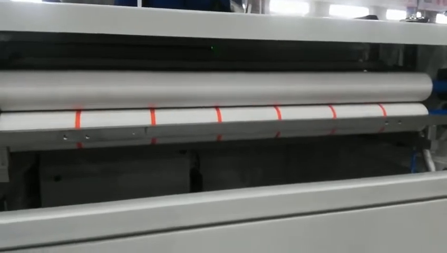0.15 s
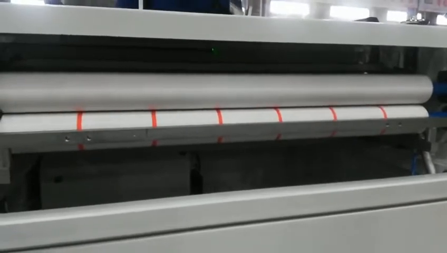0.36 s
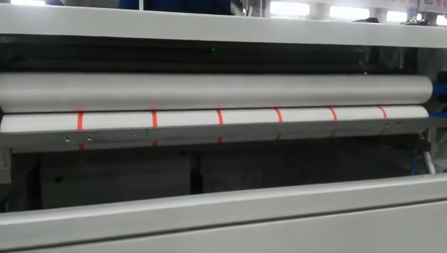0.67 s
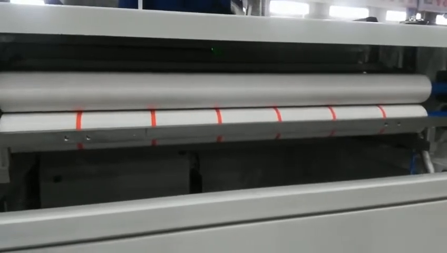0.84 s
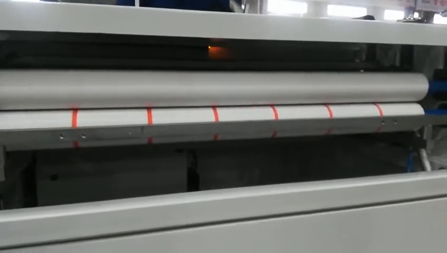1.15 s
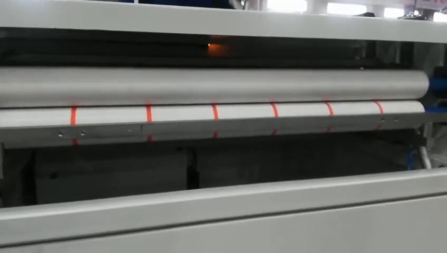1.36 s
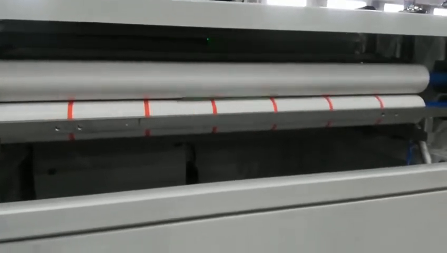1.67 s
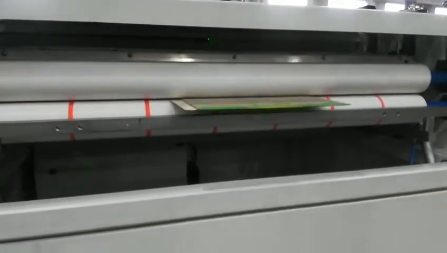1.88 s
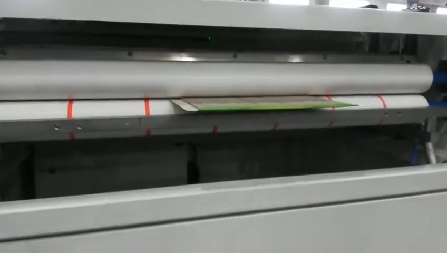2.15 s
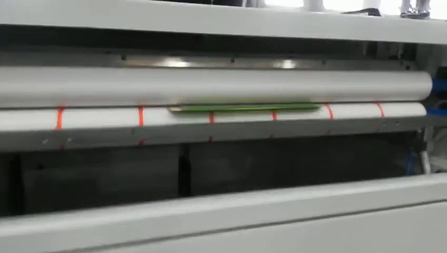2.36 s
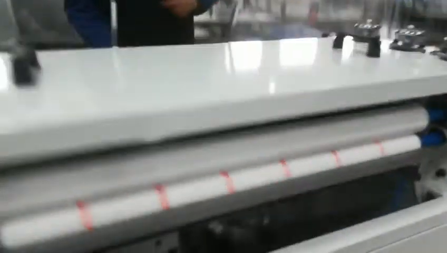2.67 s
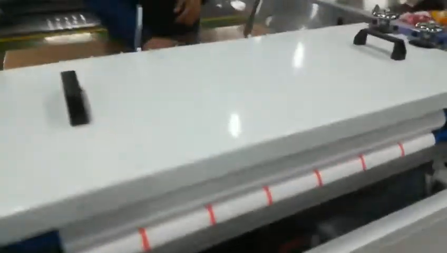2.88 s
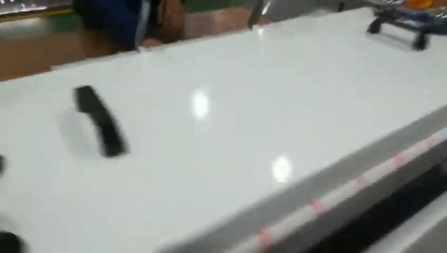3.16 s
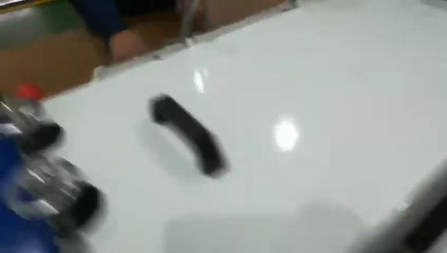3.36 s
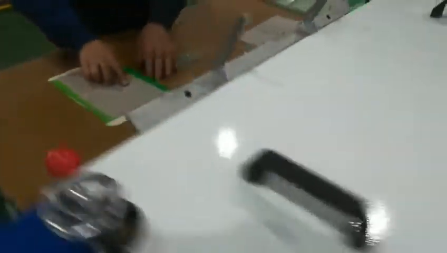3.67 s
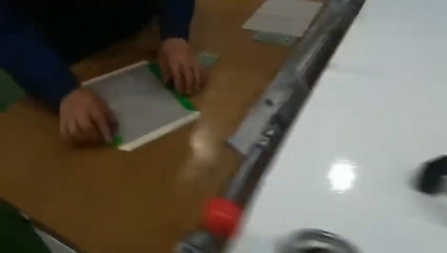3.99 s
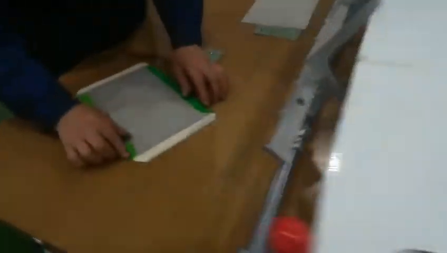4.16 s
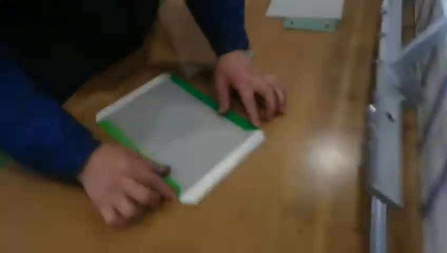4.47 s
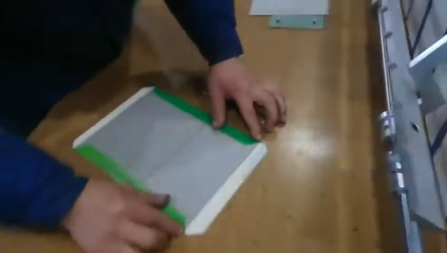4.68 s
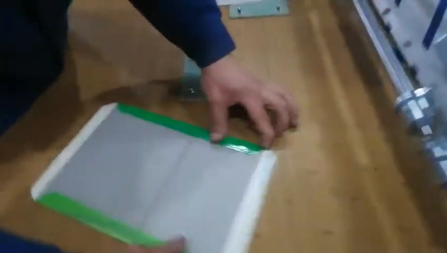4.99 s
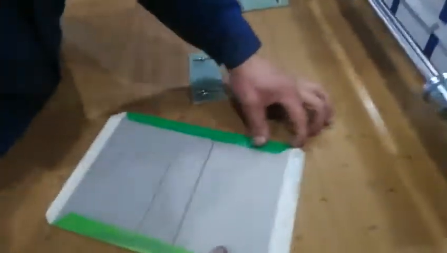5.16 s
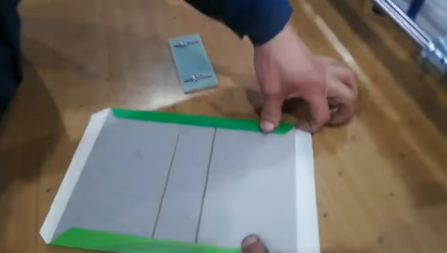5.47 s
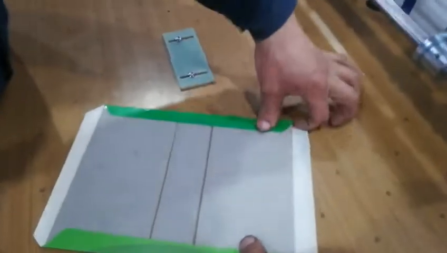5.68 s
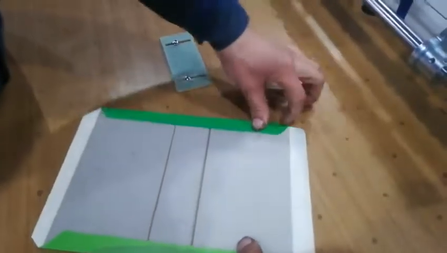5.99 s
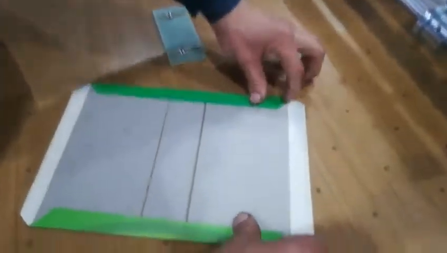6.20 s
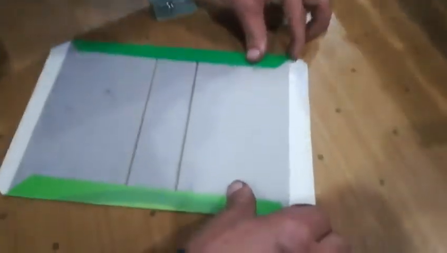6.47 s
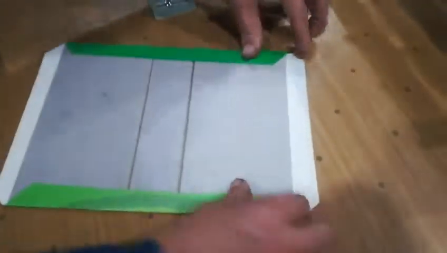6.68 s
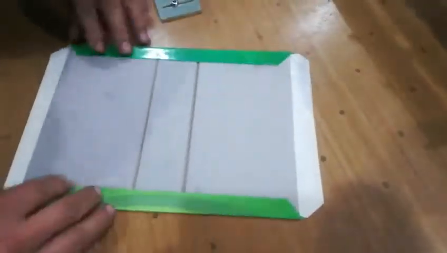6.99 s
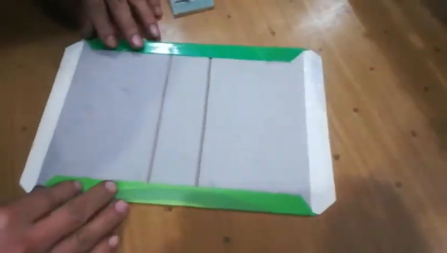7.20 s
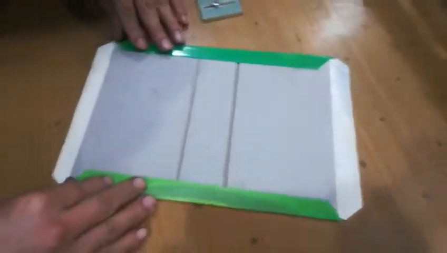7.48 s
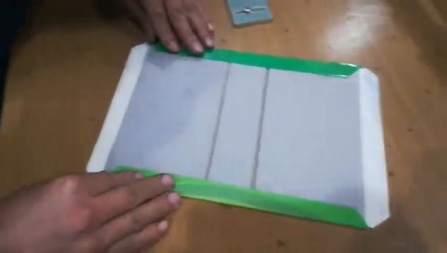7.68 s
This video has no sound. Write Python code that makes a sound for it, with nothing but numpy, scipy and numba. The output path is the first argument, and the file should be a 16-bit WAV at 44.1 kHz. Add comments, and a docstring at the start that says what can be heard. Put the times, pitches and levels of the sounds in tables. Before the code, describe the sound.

Over a motor drone, guides rattle and metal slams and scrapes repeatedly for about two seconds, followed by a swelling, lingering pneumatic hiss.

```python
"""In a factory hall, a hand-held phone hears a book-cover machine pull a board through its rollers.
Motors and a blower hum throughout: shaped noise, a noisy low resonance and thin wavering whines.
Rollers rumble, guides rattle and the board rubs: shaped noise and tiny random contacts under envelopes.
Steel folding bars clash and chatter through panel, cavity and hall echoes; then air hisses and whistles.
The phone's two ports colour the sound, and its gain control ducks everything under the loudest blows."""
import sys
import numpy as np
from scipy import signal
from scipy.fft import rfft, irfft, next_fast_len
from scipy.io import wavfile
from numba import njit

SR = 44100
rng = np.random.default_rng(int(sys.argv[2]) if len(sys.argv) > 2 else 0)


def generate_wav(sig):
    """Save sig (samples, or channels by samples) to the path in sys.argv[1] as 16-bit PCM at SR."""
    pcm = np.round(np.clip(np.atleast_2d(sig).T, -1, 1) * 32767).astype(np.int16)
    wavfile.write(sys.argv[1], SR, pcm)


N = 345744
T = np.arange(N) / SR  # time in seconds

# Source levels are those ahead of the phone's port colour and gain control.
# Idling machinery: start_s, drone_db, hum_db
IDLE_LEVELS = [(.3, -42.5, -52), (3.4, -39.5, -49.5), (4.3, -43, -50.5), (4.65, -41, -46.5),
               (6.5, -39.5, -45.5), (7.8, -41.5, -47)]
# Whines of motors and blower: pitch_hz, level_db
WHINES = [(712, -63), (1744, -61), (2509, -65), (4425, -68), (10497, -80)]
# Spectrum of the motor drone: frequency_hz, relative_db
DRONE_SPECTRUM = [(22, -38), (43, -10), (75, -8.5), (102, -5), (150, -5), (210, -3.5), (355, -10.5),
                  (600, -20), (780, -59), (1320, -120)]
# Spectrum of the blower's rush: frequency_hz, relative_db
BLOWER_SPECTRUM = [(290, -27), (500, -3), (537, -6.5), (706, 1.5), (769, 0), (927, -4), (1650, -6),
                   (2450, -2.5), (3100, -7), (3730, -7.5), (4310, -3.5), (6600, -10.5), (7600, -18),
                   (10700, -26.5), (15500, -64)]
# Spectrum of the escaping air: frequency_hz, relative_db
JET_SPECTRUM = [(880, -47), (1600, -15), (2600, -7), (3900, -3), (4300, 1.5), (5000, 2), (6800, -2.5),
                (7200, -9.5), (9230, -15), (15500, -47)]
# Squeaks of the slides and whistles of the valve: start_s, end_s, pitch_hz, level_db, waver_hz
SQUEALS = [(1.28, 1.325, 1240, -32, 110), (2.405, 2.455, 1250, -36, 130), (2.64, 2.668, 4380, -19, 160),
           (2.93, 3.165, 2380, -35.5, 140), (3.68, 3.81, 5739, -44, 22), (3.775, 3.89, 5115, -37.5, 30),
           (3.83, 4.16, 5108, -37, 30), (4.26, 4.5, 4450, -38, 130), (4.66, 5.25, 4430, -42, 130)]
# Dull knocks of the carriage: start_s, pitch_hz, level_db
KNOCKS = [(.765, 296, -28), (1.075, 160.6, -20), (1.846, 61.4, -30), (2.01, 78, -33), (2.118, 188, -25),
          (2.648, 71.4, -32), (2.96, 486, -29.5)]
# Jolts of the carriage as it starts, turns and stops: start_s, length_s, level_db
JOLTS = [(0.558, 0.39, -42.5), (1.597, 0.036, -25.5), (2.86, 0.1, -31.5)]
# Spectrum of the shaken cabinet: frequency_hz, relative_db
CABINET_SPECTRUM = [(260, -2.5), (340, -5), (500, 0.5), (720, 5), (900, -1.5), (1200, -11)]
# Pushes of the feed: start_s, end_s, start_pitch_hz, end_pitch_hz, level_db
SWISHES = [(.56, .98, 740, 1050, -43.5), (1.17, 1.31, 1005, 1300, -39.5), (1.5, 1.57, 1184, 1500, -35),
           (2.02, 2.12, 862, 1150, -41), (2.33, 2.45, 1154, 1400, -37)]
# Runs of the rollers: start_s, end_s, rumble_db
ROLLER_RUNS = [(0.74, 0.804, -29.5), (0.916, 1.254, -33.5), (1.425, 1.86, -39.5), (2.047, 2.135, -39.5)]
# Spectrum of the roller rumble: frequency_hz, relative_db
ROLLER_SPECTRUM = [(30, -16.5), (129, -7), (156, 2.5), (195, -17), (309, 1.5), (355, -11), (500, -11),
                   (650, -16), (1100, -120)]
# Spectrum of the rubbing board: frequency_hz, relative_db
BOARD_SPECTRUM = [(400, -6), (560, -4), (780, -1), (930, -2), (1230, -1.5), (1500, -3), (1900, 0),
                  (2300, -7)]
# Spectrum of the scraping slides, also used for the guides' taps: frequency_hz, relative_db
SLIDE_SPECTRUM = [(1060, -9.5), (1500, -11), (1900, -16), (2400, -6), (3300, -7), (4800, -3.5),
                  (6400, -5.5), (7440, -19.5), (9050, -25.5), (15000, -88)]
# Rattles of the guides as the board is drawn in: start_s, level_db, length_s
RATTLES = [(0.563, -32.5, .008), (0.738, -22.5, 0.009), (0.751, -20, .02), (.814, -27, 0.01),
           (0.887, -29.5, 0.058), (.944, -22.5, 0.032), (1.01, -28, .008), (1.06, -28.5, 0.014),
           (1.104, -37, .015), (1.172, -23, 0.017), (1.22, -25.5, .008), (1.259, -25.5, .012)]
# Ringing of the guides: pitch_hz, relative_db
GUIDE_MODES = [(800, 0), (1150, -2), (1850, -2), (2110, 0), (2320, 1), (4380, 0), (4700, 0), (5250, -1)]
# Ringing of the end stop: pitch_hz, relative_db, t60_s
END_STOP_MODES = [(770, -6, .08), (2420, -5, .13), (4790, 0, .09)]
# Blows of the folding bars: start_s, relative_db, low_body_db, treble_edge_db, chatter_s
BLOWS = [(1.292, -13, -5, 0.5, 0.0052), (1.317, -9.5, -10, -1, 0.0053), (1.339, -14, 5.5, 7, 0.01),
         (1.469, -15, -3, 8.5, 0.012), (1.571, -7, 2.5, 9.5, 0.055), (1.683, -17.5, 6.5, 5, 0.037),
         (1.737, -15.5, -1, 3.5, 0.033), (1.84, -25.5, 6, -1, .02), (1.89, -21, -19, -5.5, 0.01),
         (1.937, -33, -14, 0, 0.012), (2.144, -24.5, -2, 1, 0.015), (2.189, -11, 3, 7, 0.04),
         (2.286, -18, 6.5, 3, .014), (2.448, -17, 7, 5, 0.018), (2.4824, -1.5, -1.5, 7.5, 0.015),
         (2.55, -12, 1, 5, 0.012), (2.6, -17, -5, 4, 0.011), (2.646, -20, 10.5, 7, 0.0098),
         (2.849, -25, -3, -10, .006), (2.865, -10, 5, 2, 0.041), (2.96, -17.5, 6, 0.5, 0.033),
         (3.046, -24.5, -2, -7, 0.014)]
# Spectrum of the struck steel: frequency_hz, relative_db
STEEL_SPECTRUM = [(240, -29.5), (400, -22.5), (520, -24.5), (720, -14), (971, -15.5), (1150, -13),
                  (1600, -14), (1900, -9), (2510, -3), (3400, -6.5), (5000, 3), (6400, -0.5), (9060, -14.5),
                  (15500, -47)]
# Ringing of the steel frame: pitch_hz, relative_db, t60_s
FRAME_MODES = [(710, -8, .45), (1040, -6, .3), (2140, -8, .25), (2600, -6, .35), (4331, -9, .25),
               (4885, -11, .25), (5207, -10, .25), (6254, -9, .25), (8924, -2, .25)]
# Where the bars lie as the phone turns: time_s, left_minus_right_db
BEARING = [(1.5, 0.5), (2.5, 1.5), (3.05, 3.5)]
# How unlike the two ports hear the hall: frequency_hz, side_minus_mid_db
HALL_WIDTH = [(60, -37), (180, -15.5), (300, -10.5), (450, 2), (650, 6), (1000, 0.5)]
# How differently the two microphone ports colour the sound: frequency_hz, left_minus_right_db
PORT_COLOUR = [(500, 0), (750, 1), (1100, 1.5), (1600, 2), (2450, 7), (3300, -.5), (4300, -1.5), (5300, -7),
               (6100, -1), (6900, 3), (8200, 4), (10500, 8), (13000, 2)]

# cabinet resonance in which the motors hum, and the blower
HUM_HZ, HUM_WIDTH_HZ, BLOWER_DB = 199.8, 50, -41
# air valve: a slight leak, then open and shut; the top hiss builds sooner than the full rush
LEAK_S, OPEN_S, SHUT_S = 3.19, 3.78, 4.95
RUSH_DB, RUSH_RISE_S, RUSH_T60_S = -31, 0.5, 2.08
TOP_HISS_DB, TOP_RISE_S, TOP_T60_S = -41.5, 0.23, 1.34
LEAK_DB, LEAK_TOP_DB = -43, -56.5
AIR_PAN_DB = 1.8  # left minus right level of the air
SPENT_AIR_DB, SPENT_AIR_T60_S = -35.5, 1.35  # the previous release, still dying away at the start
JOLT_RISE_S, JOLT_T60_S = 0.0025, 0.97
SWISH_WIDTH_HZ, SWISH_RISE_S, SWISH_T60_S = 450, 0.012, 0.12
SPIN_UP_S, SPIN_DOWN_T60_S = 0.046, 1
# feed stroke: the slides start, the board is gripped, and both come to rest together
STROKE_START_S, GRIP_S, STROKE_END_S = 0.566, 0.74, 3.0
STROKE_ATTACK_S, STROKE_T60_S = 0.033, 0.37
GLIDE_DB, SLIP_DB, RUB_DB = -38.5, -46.5, -42  # slides running freely, board sliding in, board gripped
DRAG_DB = -4.5  # added rub while the rollers run, relative to their rumble
# grating after a blow: level at a 0 dB blow, growth in dB per dB of blow, rise, decay
GRATE_DB, GRATE_PER_DB, GRATE_RISE_S, GRATE_T60_S = -11, 0.7, 0.069, 0.38
FULL_CHATTER_S = 0.0089  # chatter length that leaves the grating unscaled; longer grates louder
RUN_UP_DB, RUN_UP_S = -22, 0.063  # scrape swelling around a blow: relative to it, time constant
RATTLE_RISE_S, RATTLE_T60_S = 0.00091, 0.1
BUZZ_DB = -12  # buzz of the guides, relative to the roller rumble
END_STOP_S, END_STOP_DB = 2.8645, -15.5
BLOW_RISE_S = 0.0022
TOP_HZ = 15650  # the phone's treble cut-off


def undb(db):
    """Decibels to amplitude."""
    return 10 ** (np.asarray(db) / 20)


def unit(x):
    """Scale to an RMS of one."""
    return x / np.sqrt(np.mean(x ** 2) + 1e-18)


def on_log(points, hz):
    """Read a spectrum at the given frequencies, along a logarithmic axis."""
    f, db = np.transpose(points)
    return np.interp(np.log(hz + 1), np.log(f), db)


def colour(x, points):
    """Causal minimum-phase filter with the given spectrum, falling steeply beyond its ends."""
    size = 4096
    hz = np.fft.rfftfreq(size, 1 / SR) + 1
    octaves_beyond = np.abs(np.log2(hz / np.clip(hz, points[0][0], points[-1][0])))
    level_db = on_log(points, hz) - np.minimum(40 * octaves_beyond, 70)
    # folding the cepstrum forward in time makes the filter causal
    cepstrum = irfft(np.log(undb(level_db)))
    cepstrum[1:size // 2] *= 2
    cepstrum[size // 2 + 1:] = 0
    response = irfft(np.exp(rfft(cepstrum)))
    return signal.oaconvolve(x, response[None], axes=1)[:, :x.shape[1]]


def diffuse(size):
    """Noise from all sides at two ports: alike in the bass, nearly unrelated in the treble."""
    fast = next_fast_len(size, True)
    mid, side = rfft(rng.standard_normal((2, fast)))
    width = undb(on_log(HALL_WIDTH, np.fft.rfftfreq(fast, 1 / SR)))
    mid = mid / np.hypot(1, width)
    side = side * width / np.hypot(1, width)
    return unit(irfft(np.array([mid + side, mid - side]), fast)[:, :size])


def walk(rate):
    """Smooth random wandering through `rate` knots per second, with a spread near 1."""
    knots = rng.standard_normal(SR // 4)
    return np.interp(T * rate, np.arange(len(knots)), knots)


def fade(t, t60):
    """Exponential decay by 60 dB in t60 seconds."""
    return np.exp(-np.log(1000) * t / t60)


def held(start, end, attack_s, t60):
    """Envelope that rises from start, holds until end, then dies away."""
    return np.clip((T - start) / attack_s, 0, 1) * fade(np.maximum(T - end, 0), t60)


def band(hz, width_hz):
    """A noisy resonance whose centre may move."""
    angle = 2 * np.pi * np.cumsum(hz * np.ones(N)) / SR
    return unit(walk(width_hz) * np.cos(angle) + walk(width_hz) * np.sin(angle))


def contacts(rate, spread_db):
    """Tiny random contacts of very unequal strength, `rate` per second on average."""
    hits = rng.random(N) < rate / SR
    strength = rng.standard_normal(N) * undb(spread_db * rng.standard_normal(N))
    return unit(hits * strength)


def panel(push, panel_t60=0.016, count=3):
    """Contacts land on several places of a sheet-steel panel; each rattles briefly in its own way."""
    size = 2048
    place, out = rng.integers(count, size=len(push)), 0
    for k in range(count):
        response = unit(diffuse(size) * fade(T[:size], panel_t60)) / np.sqrt(size)
        out = out + signal.oaconvolve((push * (place == k))[None], response, axes=1)[:, :len(push)]
    return out


def cavity(x, cavity_db=-4):
    """Dense echoes inside the machine, drawn afresh for every source."""
    size, cavity_t60 = SR // 3, 0.32
    tail = undb(cavity_db) * unit(diffuse(size) * fade(T[:size], cavity_t60)) / np.sqrt(size)
    return x + signal.fftconvolve(x, tail, axes=1)[:, :x.shape[1]]


def housing(x, hall_db=-17):
    """The sound rings the steel frame's modes and dies away in the hall."""
    t = T[:SR]
    hall_t60, ring_db = 0.9, -20
    hz, db, t60 = np.transpose(FRAME_MODES)[:, :, None]
    phase = rng.random((2, len(FRAME_MODES), 1))
    modes = undb(db) * fade(t, t60) * np.sin(2 * np.pi * (hz * t + phase))
    hall = undb(hall_db) * unit(diffuse(SR) * fade(t, hall_t60))
    tail = hall + undb(ring_db) * unit(modes.sum(axis=1))
    return x + signal.oaconvolve(x, tail / np.sqrt(SR), axes=1)[:, :N]


def idling(flicker_db=1.0):
    """Motors drone, hum and throb in the cabinet; a blower rushes under thin wavering whines."""
    times, *levels = np.transpose(IDLE_LEVELS)
    drone, hum = (undb(np.interp(T, times, db)) for db in levels)
    out = drone * undb(0.8 * walk(30)) * unit(colour(diffuse(N), DRONE_SPECTRUM))
    out += hum * band(HUM_HZ, HUM_WIDTH_HZ)
    out += undb(BLOWER_DB) * undb(flicker_db * walk(15)) * unit(colour(diffuse(N), BLOWER_SPECTRUM))
    for hz, db in WHINES:
        # a random phase at each port; pitch and level both waver
        turns = np.cumsum(hz + 18 * walk(90)) / SR + rng.random((2, 1)) / 2
        out += undb(db + 2.5 * walk(5)) * np.sqrt(2) * np.sin(2 * np.pi * turns)
    return out


def air_valve(flutter_db=0.93):
    """Turbulent air leaks faintly; as the valve opens, a thin hiss builds ahead of the fuller rush."""
    leak = held(LEAK_S, OPEN_S, TOP_RISE_S, RUSH_T60_S)
    rush = undb(RUSH_DB) * held(OPEN_S, SHUT_S, RUSH_RISE_S, RUSH_T60_S) + undb(LEAK_DB) * leak
    rush += undb(SPENT_AIR_DB) * fade(T, SPENT_AIR_T60_S)
    top = undb(TOP_HISS_DB) * held(OPEN_S, SHUT_S, TOP_RISE_S, TOP_T60_S) + undb(LEAK_TOP_DB) * leak
    jet = colour(diffuse(N), JET_SPECTRUM) * undb(flutter_db * walk(15))
    lower = signal.sosfiltfilt(signal.butter(6, 7200, fs=SR, output="sos"), jet)
    pan = undb(np.array([[1], [-1]]) * AIR_PAN_DB / 2)
    return (rush * unit(lower) + top * unit(jet - lower)) * pan


def squeals():
    """Short tones of sticking slides and whistling air; a wide waver roughens, a narrow one stays purer."""
    out = np.zeros((2, N))
    for start, end, hz, db, waver_hz in SQUEALS:
        swell = np.abs(np.sin(np.pi * np.clip((T - start) / (end - start), 0, 1))) ** 0.8
        turns = np.cumsum(hz + waver_hz * walk(500)) / SR + rng.random((2, 1)) / 4
        out += undb(db + 2.5 * walk(42)) * swell * np.sin(2 * np.pi * turns)
    return out


def knocks(t60=0.18, rise_s=0.0017):
    """The carriage bumps its stops and the cabinet booms briefly: decaying low tones."""
    out, t = np.zeros(N), T[:SR // 2]
    for s, hz, db in KNOCKS:
        i = int(s * SR)
        envelope = (1 - np.exp(-t / rise_s)) * fade(t, t60)
        out[i:i + len(t)] += undb(db) * envelope * np.sin(2 * np.pi * hz * t)
    return out


def jolts():
    """Each jolt of the carriage shakes the cabinet, which answers with a hollow thud."""
    shake = sum(undb(db) * held(s, s + length, JOLT_RISE_S, JOLT_T60_S) for s, length, db in JOLTS)
    return shake * unit(colour(diffuse(N), CABINET_SPECTRUM))


def swishes():
    """Each push of the feed judders and swishes upward in pitch as it gathers speed."""
    times = np.ravel([row[:2] for row in SWISHES])
    pitches = np.ravel([row[2:4] for row in SWISHES])
    hz = np.interp(T, times, pitches)
    push = sum(undb(db) * held(start, end, SWISH_RISE_S, SWISH_T60_S)
               for start, end, _, _, db in SWISHES)
    judder = unit(undb(4 * walk(90)))
    return push * judder * np.array([band(hz, SWISH_WIDTH_HZ) for _ in range(2)])


def roller_effort():
    """The rollers spin up for each run and coast down after it."""
    return sum(undb(db) * held(start, end, SPIN_UP_S, SPIN_DOWN_T60_S) for start, end, db in ROLLER_RUNS)


def slide_effort():
    """The slides glide steadily, swell around each blow and grate after it; powers add."""
    power = undb(GLIDE_DB) ** 2
    for s, db, *_, length in BLOWS:
        run_up = undb(RUN_UP_DB + db) * np.exp(-np.abs(T - s) / RUN_UP_S)
        grate = undb(GRATE_DB + GRATE_PER_DB * db) * held(s, s, GRATE_RISE_S, GRATE_T60_S)
        power = power + run_up ** 2 + grate ** 2 * abs(length / FULL_CHATTER_S)
    return np.sqrt(power)


def feed(judder_db=2):
    """Rollers rumble, the board rubs between them and the slides scrape unevenly, louder about the blows."""
    moving = held(STROKE_START_S, STROKE_END_S, STROKE_ATTACK_S, STROKE_T60_S)
    gripped = held(GRIP_S, STROKE_END_S, STROKE_ATTACK_S, STROKE_T60_S)
    rumble = roller_effort()
    slip, grip, drag = undb(SLIP_DB) * moving, undb(RUB_DB) * gripped, undb(DRAG_DB) * rumble
    rub = np.sqrt(slip ** 2 + grip ** 2 + drag ** 2)
    scrape = moving * slide_effort()
    judder = undb(judder_db * walk(44.94))
    # separate contacts at each port: fibres of the board, burrs of the slides
    fibres = judder * np.array([contacts(rate=5000, spread_db=1.5) for _ in range(2)])
    burrs = judder * np.array([contacts(rate=5000, spread_db=1.5) for _ in range(2)])
    rollers = rumble * unit(colour(diffuse(N), ROLLER_SPECTRUM))
    board = rub * unit(colour(cavity(fibres), BOARD_SPECTRUM))
    slides = scrape * unit(colour(housing(cavity(burrs)), SLIDE_SPECTRUM))
    return rollers + board + slides


def guides(ring_t60=0.046):
    """Loose guides rattle in bursts and buzz while the rollers turn; every tap rings their modes."""
    bursts = sum((undb(db) * held(s, s + length, RATTLE_RISE_S, RATTLE_T60_S)) ** 2
                 for s, db, length in RATTLES)
    shake = np.sqrt(bursts + (undb(BUZZ_DB) * roller_effort()) ** 2)
    taps, t = contacts(rate=2000, spread_db=2), T[:SR // 10]
    # each mode takes a random sign at each port
    modes = sum(undb(db) * rng.choice([-1, 1], (2, 1)) * np.sin(2 * np.pi * hz * t)
                for hz, db in GUIDE_MODES)
    ring = modes * fade(t, ring_t60)
    rung = undb(-6) * unit(signal.oaconvolve(taps[None], ring, axes=1)[:, :N])
    clatter = unit(colour(panel(taps), SLIDE_SPECTRUM))
    return cavity(shake * unit(clatter + rung))


def end_stop():
    """A late blow lands on the solid end stop, whose decaying modes knock and ring in the cavity."""
    t = np.maximum(T - END_STOP_S, 0)
    ring = sum(undb(db) * fade(t, t60) * np.sin(2 * np.pi * hz * t) for hz, db, t60 in END_STOP_MODES)
    return cavity(undb(END_STOP_DB) * ring[None], cavity_db=-1)


def folding_bars(release_t60=0.059, edge_t60=0.31):
    """Each blow bites, then the bar chatters along its stop, ever duller; the steel housing radiates it."""
    chatter, out, t = contacts(rate=4000, spread_db=1.0), np.zeros((2, N)), T[:SR // 3]
    hz = np.fft.rfftfreq(len(t), 1 / SR)
    low = 1 / (1 + (hz / 1900) ** 4)
    edge = 1 / (1 + ((hz - 10000) / 2600) ** 4)  # a treble band around 10 kHz
    for s, db, body_db, edge_db, length in BLOWS:
        i = int(s * SR)
        envelope = np.clip(t / BLOW_RISE_S, 0, 1) * fade(np.maximum(t - length, 0), release_t60)
        push = chatter[i:i + len(t)] * envelope
        spectrum = rfft(panel(push)) * undb(body_db * low + edge_db * edge)
        body = irfft(spectrum * (1 - edge), len(t))
        treble = irfft(spectrum * edge, len(t)) * fade(t, edge_t60)
        out[:, i:i + len(t)] += undb(db) * cavity((body + treble) * (1 - t / t[-1]))
    steel_gain = np.std(colour(rng.standard_normal((1, SR)), STEEL_SPECTRUM))
    pan_db = np.interp(T, *np.transpose(BEARING))
    pan = undb(np.array([pan_db, -pan_db]) / 2)
    return colour(housing(out), STEEL_SPECTRUM) / steel_gain * pan


def scene():
    """The whole machine in its hall, from the background to the folding bars."""
    background = idling() + air_valve() + squeals()
    carriage = knocks() + jolts() + swishes()
    return background + carriage + feed() + guides() + end_stop() + folding_bars()


@njit
def follow(x, attack, release):
    """Envelope that rises fast and sinks slowly."""
    out, e = np.empty(len(x)), 0.
    for i in range(len(x)):
        e += (x[i] - e) * (attack if x[i] > e else release)
        out[i] = e
    return out


def record(dry):
    """The phone: port colour, gain control shared by both ports, clipping and treble cut-off."""
    size = next_fast_len(N, True)
    hz = np.fft.rfftfreq(size, 1 / SR)
    tilt = undb(np.array([[1], [-1]]) * on_log(PORT_COLOUR, hz) / 2)
    tilt = tilt / np.sqrt(np.mean(tilt ** 2, axis=0))  # mean power gain of the two ports is one
    x = irfft(rfft(dry, size) * tilt, size)[:, :N]
    attack_s, release_s, knee_db = 0.0008, 0.07, -3.5
    envelope = follow(np.abs(x).max(axis=0), 1 / (attack_s * SR), 1 / (release_s * SR))
    ducked = x / np.sqrt(1 + (envelope / undb(knee_db)) ** 2)
    clipped = np.clip(ducked, -0.95, 0.95)
    return signal.sosfilt(signal.ellip(10, 0.2, 70, TOP_HZ, fs=SR, output="sos"), clipped)


dry = scene()
out = record(dry)
generate_wav(out)
```